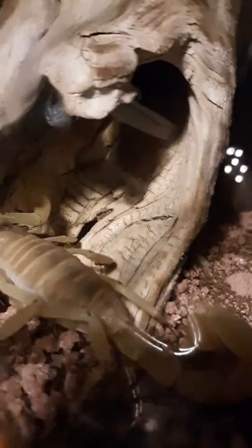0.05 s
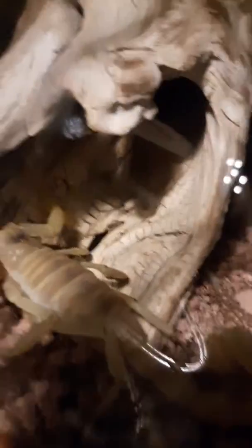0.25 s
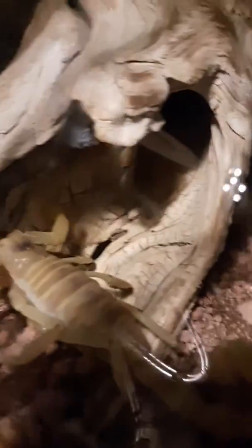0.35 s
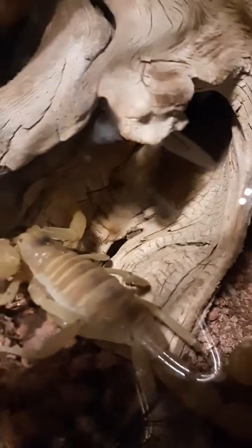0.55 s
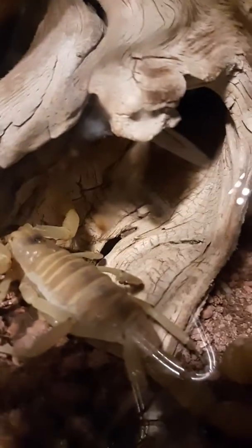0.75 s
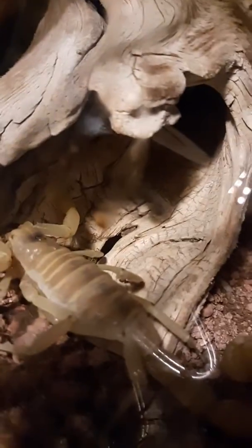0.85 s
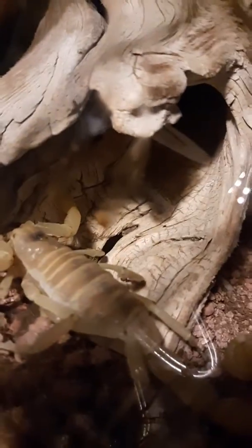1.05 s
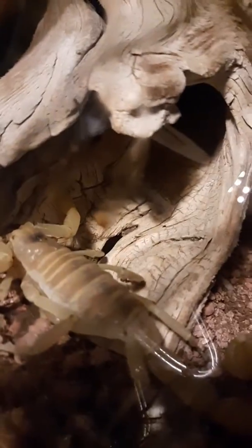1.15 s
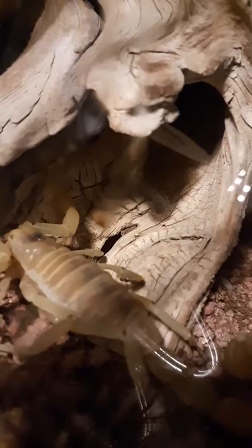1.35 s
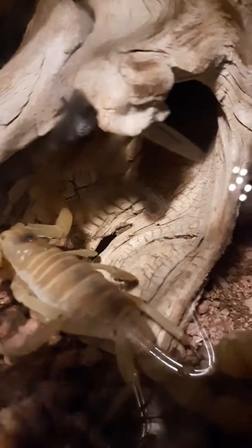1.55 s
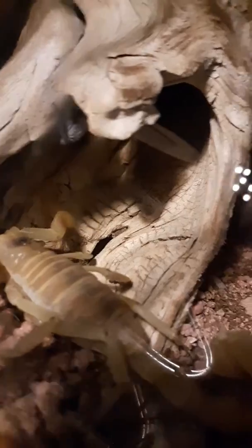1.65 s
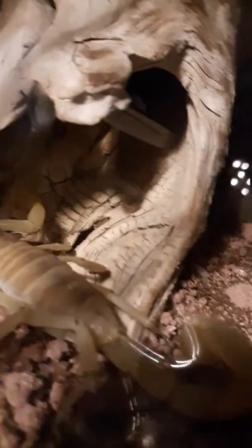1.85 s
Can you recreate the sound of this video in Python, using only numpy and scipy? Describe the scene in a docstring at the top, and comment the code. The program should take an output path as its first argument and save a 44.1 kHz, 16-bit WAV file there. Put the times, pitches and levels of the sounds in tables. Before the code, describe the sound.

Something clicks against a glass case and scrapes it briefly, then taps several more times, one tap loud. Heard up close in a quiet room, the ticks sit left and their low thumps right, with light brushes and grip rumble.

```python
"""In a quiet room, something clicks a few times against a glass case and scrapes it once, very close by.
Each contact gives a bright tick on the left and a dull thump, carried through the case, on the right.
After the first click the surface slides for a fifth of a second, in many tiny slips.
Light brushes, a short rub and the rumble of a shifting grip lie over the room's hush."""
import sys
import numpy as np
from scipy import signal
from scipy.fft import rfft, irfft, next_fast_len
from scipy.io import wavfile

SR = 44100
rng = np.random.default_rng(int(sys.argv[2]) if len(sys.argv) > 2 else 0)


def bounce(signal):
    """Save signal as a 16-bit WAV file at the path given by the first command-line argument."""
    frames = np.transpose(np.atleast_2d(signal))
    limited = np.clip(frames, -1, 1)
    pcm = np.round(limited * 32767).astype(np.int16)
    wavfile.write(sys.argv[1], SR, pcm)


N = 83790
T = np.arange(N) / SR
SIZE = next_fast_len(2 * N)
F = np.maximum(np.arange(SIZE // 2 + 1) * SR / SIZE, 1e-3)  # frequencies [Hz]

# tone of the room's hush (frequency [Hz], left level [dB], right level [dB])
HUSH_TONE = [(23.9, -58, -43), (53, -46.5, -45), (115, -44.5, -46), (195, -56.5, -56), (367, -58, -63.5),
             (524, -52.5, -64.5), (940, -51.5, -62.5), (1504, -70, -72), (2480, -72.5, -73),
             (6220, -73, -74), (7200, -64, -73.5), (8160, -75.5, -76), (15500, -73.5, -73.5)]
# swells in the hush (time [s], rise [s], fall [s], level [dB], pitch [Hz], width [Hz])
HUSH_SWELLS = [(0.51, 0.057, 0.02, -50, 1110, 490), (0.66, 0.21, 0.14, -45.5, 780, 288),
               (1.86, 0.1, 0.14, -54, 860, 650)]
# shifts of the grip (time [s], rise [s], fall [s], level [dB])
GRIP_SHIFTS = [(0.105, 0.045, 0.038, -27.5), (0.179, 0.023, 0.03, -31.5), (0.469, 0.064, 0.035, -35.5),
               (0.60, 0.068, 0.011, -36.5), (0.653, 0.017, 0.02, -26.5), (0.77, 0.051, 0.063, -39),
               (1.049, 0.031, 0.058, -41), (1.70, 0.095, 0.062, -35.5)]
# tone of the grip's rumble (frequency [Hz], level [dB])
RUMBLE_TONE = [(25, -14.5), (60, 1.5), (100, 0.5), (160, -5), (250, -18), (450, -40.5), (1500, -52)]
# light brushes (time [s], rise [s], fall [s], level [dB], pitch [Hz], width [Hz])
BRUSH_STROKES = [(0.190, 0.014, 0.017, -44, 3860, 1210), (0.190, 0.014, 0.014, -53.5, 6400, 2960),
                 (0.473, 0.0029, 0.0052, -47.5, 6600, 4400), (1.179, 0.0052, 0.012, -53, 3860, 3000),
                 (1.21, 0.075, 0.088, -64, 4750, 4000), (1.335, .025, 0.048, -65, 10800, 3520),
                 (1.82, 0.099, 0.1, -56, 5500, 1400)]
# notes that the rub rings (pitch [Hz], width [Hz], level [dB])
RUB_NOTES = [(750, 170, -2), (1123, 180, 1.5), (1460, 300, -26), (2150, 760, -17), (4330, 530, -18)]
# how hard the scrape presses (time [s], level [dB])
SCRAPE_PRESSURE = [(0.224, -11), (0.243, -5), (0.255, 2), (0.284, -1), (0.302, 2), (0.33, -1), (0.365, -4),
                   (0.397, 0), (0.412, -5), (0.425, -20)]
# tone of the scrape on each side (frequency [Hz], level [dB])
SCRAPE_TONE_LEFT = [(100, -60), (400, -61.5), (1100, -57), (1850, -67), (2300, -56), (2800, -62.5),
                    (3500, -49), (4600, -54), (6200, -47.5), (7400, -41), (9300, -48), (11300, -37.5),
                    (13000, -45), (15500, -66)]
SCRAPE_TONE_RIGHT = [(40, -36), (110, -29.5), (210, -26), (310, -36), (450, -47), (640, -40), (790, -53),
                     (960, -35.5), (1300, -54), (1650, -44), (1950, -69.5), (2350, -65.5), (2900, -73),
                     (3600, -57), (4700, -75), (12000, -70.5), (16000, -88)]
# notes that a knock rings in the case (pitch [Hz], width [Hz], left level [dB], right level [dB])
KNOCK_NOTES = [(267.6, 61, -16, 9), (465, 130, -8, -2), (671, 126, -17, 2.5), (817, 210, -1.5, -0.5),
               (993, 213, -12.5, 4.5), (1307, 190, -4.5, -8.5), (1602, 174, -16, -3.5),
               (2267, 206, -22, -11.5), (4860, 2200, -23, -43)]
# bright notes that a tick rings (pitch [Hz], width [Hz], level [dB])
TICK_NOTES = [(3573, 526, -4.5), (4500, 600, -13.5), (5940, 500, -2.5), (6550, 800, -0.5), (7450, 1170, -2),
              (8350, 1300, -1), (9400, 1040, 0), (11200, 1900, 3.5), (12500, 1460, -3.5)]
# contacts with the glass (time [s], thump gain [dB], thump cut-off [Hz], knock gain [dB],
# tick gain [dB], tick cut-off [Hz], boosted pitch [Hz], boost [dB])
CLICKS = [(0.2186, 32, 214, -9, 1.5, 15500, 7400, 5.5), (1.1201, 16.5, 240, -18.5, -36, 9000, 7600, 17.5),
          (1.2492, 27.5, 247, 6.5, -10.5, 11100, 10200, 8), (1.2763, 9, 280, -30, -37.5, 5900, 4000, 12),
          (1.349, 10.5, 185, -23, -22.5, 11800, 7500, 12.5), (1.4746, -7.5, 250, -52, -66, 8000, 7400, -9),
          (1.6809, 6.5, 213, -36, -57, 8000, 7400, -8)]


def gain(db):
    """Turn decibels into a number to multiply by."""
    return 10 ** (np.asarray(db) / 20)


def through(x, response):
    """Pass a sound through a filter."""
    return irfft(rfft(x, SIZE) * response, SIZE)[..., :N]


def band(hz, width):
    """A filter that rings at one pitch."""
    return 1 / (1 + 1j * (F - hz * hz / F) / width)


def low_pass(hz, q=np.sqrt(.5)):
    """A filter that keeps the lows; a higher q rings more."""
    return 1 / (1 - (F / hz) ** 2 + 1j * F / hz / q)


def high_pass(hz, q=np.sqrt(.5)):
    """A filter that keeps the highs."""
    return -(F / hz) ** 2 * low_pass(hz, q)


def ringing(notes, side=0):
    """A filter that rings at several pitches at once."""
    return sum(band(hz, width) ** 2 * gain(levels[side]) for hz, width, *levels in notes)


def tone(rows, side=0):
    """A filter drawn through a table's points."""
    rows = np.array(rows)
    return gain(np.interp(np.log(F), np.log(rows[:, 0]), rows[:, 1 + side]))


def noise(response):
    """Noise shaped by a filter."""
    return through(rng.standard_normal(N), response)


def swell(at, rise, fall, db):
    """A rounded rise and fall in loudness."""
    return gain(db) * np.exp(-((T - at) / np.where(T < at, rise, fall)) ** 2)


def hisses(rows, right_db):
    """Soft swells of hiss, turned down on the right."""
    hiss = sum(swell(*shape) * noise(band(hz, width) ** 2) for *shape, hz, width in rows)
    return hiss * gain([[0], [right_db]])


def tail(db, fade_s):
    """A filter of dense echoes, different on each side, that fall 60 dB in fade_s."""
    echoes = rng.standard_normal((2, N)) * np.exp(-np.log(1000) * T / fade_s)
    echoes /= np.sqrt(np.sum(echoes ** 2, axis=1, keepdims=True))
    return gain(db) * rfft(echoes, SIZE)


def room():
    """The room's hush and microphone hiss; the middle pitches swell now and then."""
    hush = np.array([noise(tone(HUSH_TONE, side)) for side in (0, 1)])
    return hush + hisses(HUSH_SWELLS, right_db=-16.5)


def handling():
    """Small shifts of the grip rumble, mostly on the right."""
    return sum(swell(*shift) for shift in GRIP_SHIFTS) * noise(tone(RUMBLE_TONE)) * gain([[-22], [0]])


def brushes():
    """Light brushing touches hiss, mostly on the left."""
    return hisses(BRUSH_STROKES, right_db=-22)


def rub():
    """A short rub makes a few notes ring, mostly on the left."""
    force = swell(at=.475, rise=0.0066, fall=0.0059, db=-28.5) * rng.standard_normal(N)
    return through(force, ringing(RUB_NOTES)) * gain([[0], [-25]])


def scrape(slips_per_s=900, spread_db=5.5, hiss_share=.45, judder_db=1):
    """Tiny uneven slips over a smooth hiss: bright on the left, a low rasp via the case on the right."""
    slips = (rng.random(N) < slips_per_s / SR) * rng.choice([-1, 1], N)
    slips = slips * gain(spread_db * np.clip(rng.standard_normal(N), -2.5, 2.5))
    force = np.sqrt(1 - hiss_share) * slips / slips.std() + np.sqrt(hiss_share) * rng.standard_normal(N)
    times, levels = np.array(SCRAPE_PRESSURE).T
    pressure_db = np.interp(T, times, levels, left=-np.inf, right=-np.inf)
    judder = noise(low_pass(hz=70))  # the sliding grips and eases
    force *= gain(pressure_db + judder_db * judder / judder.std())
    return through(force, np.array([tone(SCRAPE_TONE_LEFT), tone(SCRAPE_TONE_RIGHT)]))


def clicks(thump_lag_s=0.001):
    """Each contact shakes the case into a low thump, a middle knock and a high tick; echoes follow."""
    thumps, knocks, ticks = np.zeros((3, 2, N))
    delay = np.exp(-2j * np.pi * F * thump_lag_s)  # the heavy push comes just after the tick
    thump = high_pass(102.6, q=1.22) * high_pass(61.6) * delay * gain([[-38], [0]])  # faint on the left
    knock = np.array([ringing(KNOCK_NOTES, side=0), -ringing(KNOCK_NOTES, side=1)])
    tick_left = ringing(TICK_NOTES)
    tick_right = tick_left * gain(-14) * low_pass(3150)  # the case passes only a tick's low end
    tick = np.array([tick_left, tick_right])
    for at, thump_db, thump_hz, knock_db, tick_db, tick_hz, boost_hz, boost_db in CLICKS:
        blow = np.zeros(N)
        blow[int(at * SR)] = 1
        boost = 1 + gain(boost_db) * band(boost_hz, width=720)  # the spot that is hit favours some notes
        thumps += through(blow, gain(thump_db) * thump * low_pass(thump_hz, q=0.59) ** 2)
        knocks += through(blow, gain(knock_db) * knock)
        ticks += through(blow, gain(tick_db) * tick * low_pass(tick_hz) ** 2 * boost)
    thumps = through(thumps, 1 + tail(db=-17, fade_s=0.13))  # a low ring lingers
    knocks = through(knocks, 1.5 + tail(db=-14.5, fade_s=0.12) * high_pass(503))
    ticks = through(ticks, 1.5 + tail(db=-21, fade_s=.2))
    return thumps + knocks + ticks


def scene():
    """Add up all the sounds, left and right."""
    return room() + handling() + brushes() + rub() + scrape() + clicks()


def record(dry, top_hz=16200):
    """Cut away the very highest treble."""
    return signal.sosfilt(signal.ellip(8, .2, 70, top_hz, fs=SR, output="sos"), dry)


dry = scene()
out = record(dry)
bounce(out)
```